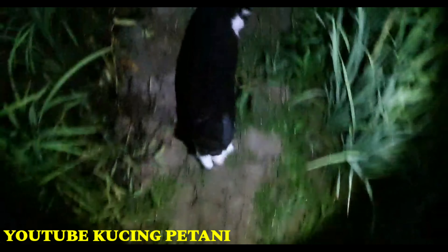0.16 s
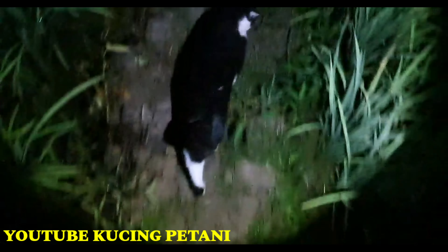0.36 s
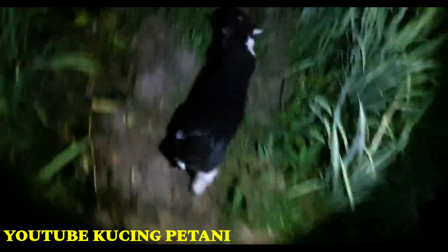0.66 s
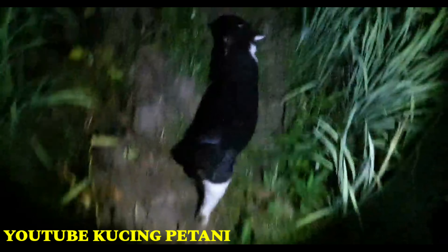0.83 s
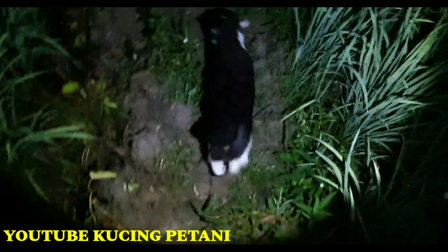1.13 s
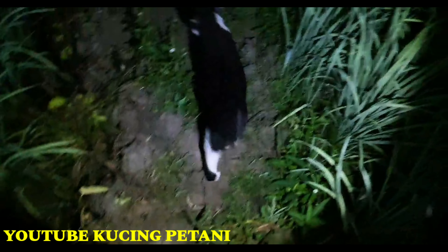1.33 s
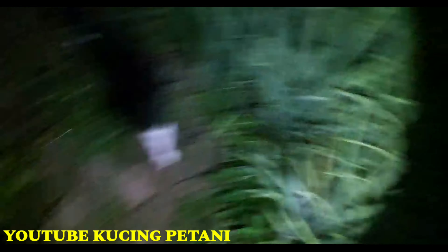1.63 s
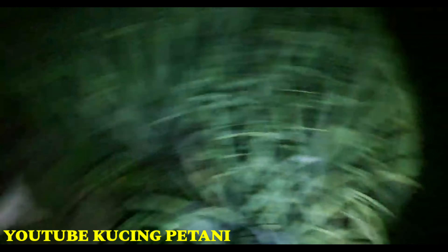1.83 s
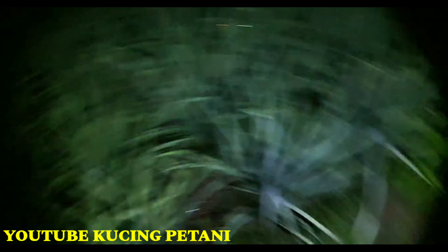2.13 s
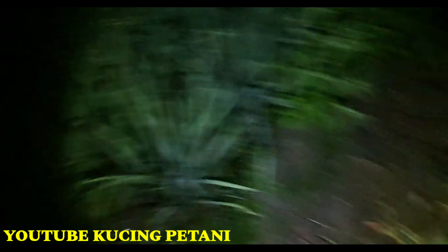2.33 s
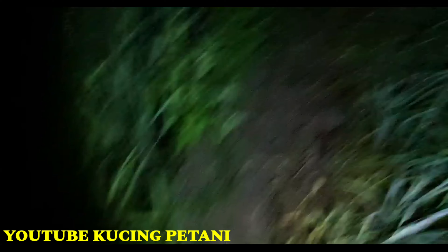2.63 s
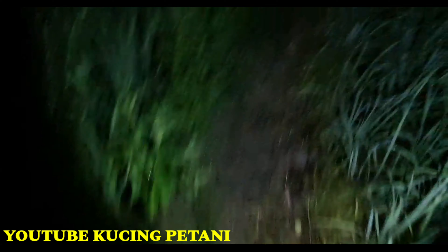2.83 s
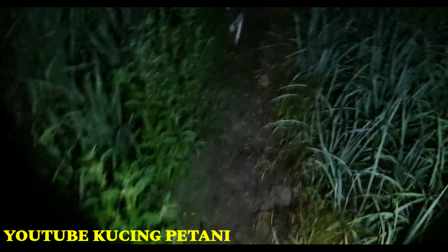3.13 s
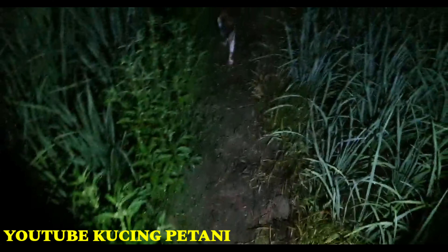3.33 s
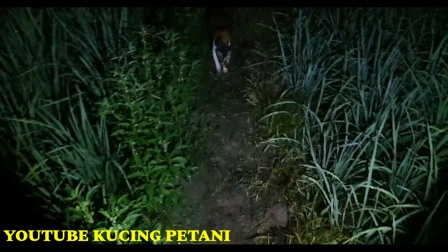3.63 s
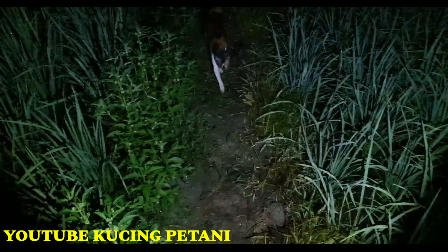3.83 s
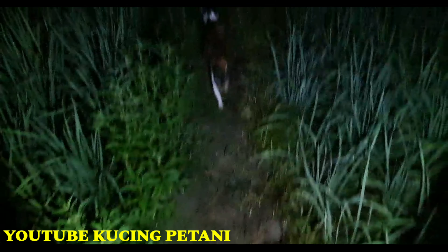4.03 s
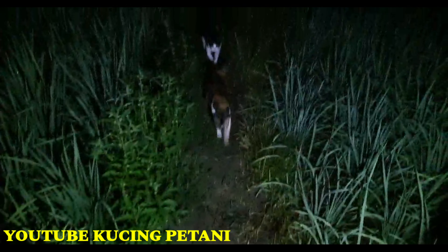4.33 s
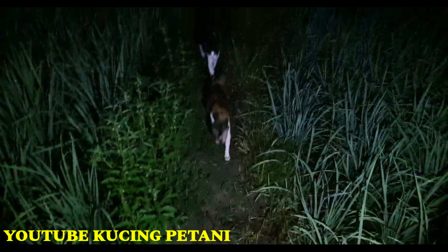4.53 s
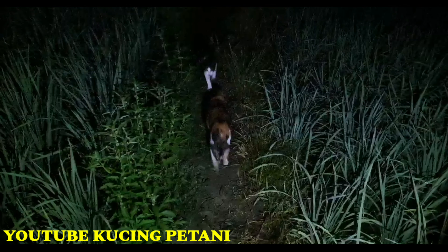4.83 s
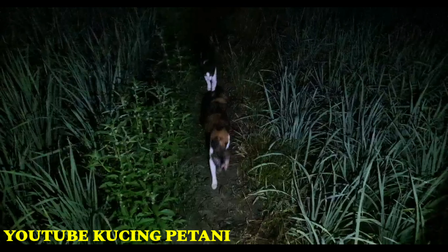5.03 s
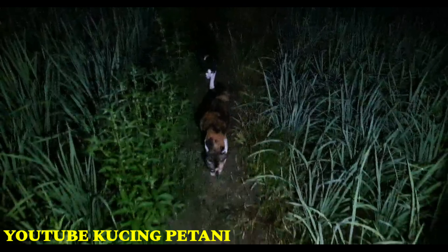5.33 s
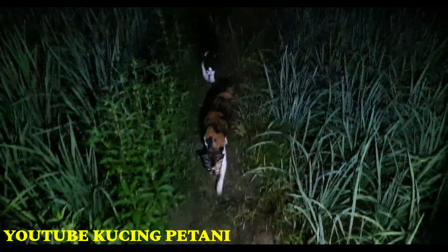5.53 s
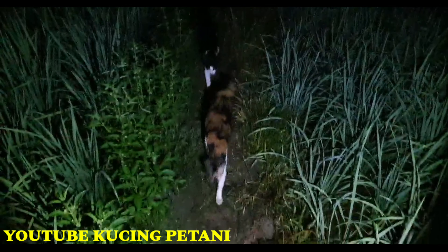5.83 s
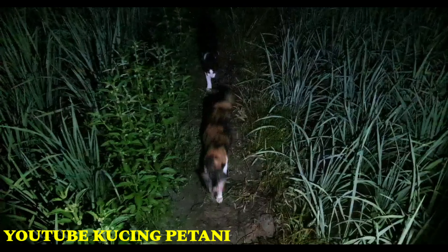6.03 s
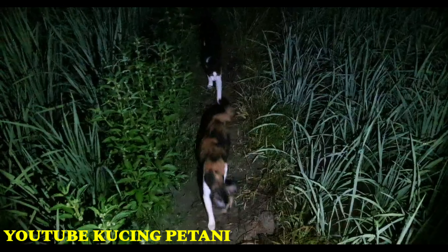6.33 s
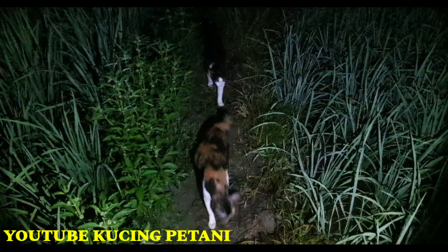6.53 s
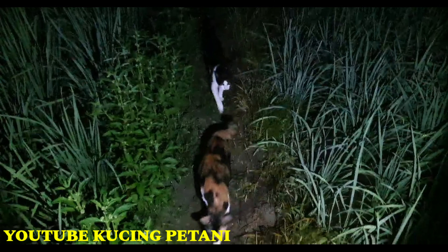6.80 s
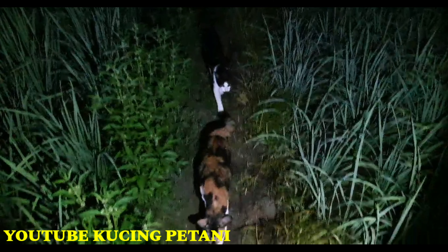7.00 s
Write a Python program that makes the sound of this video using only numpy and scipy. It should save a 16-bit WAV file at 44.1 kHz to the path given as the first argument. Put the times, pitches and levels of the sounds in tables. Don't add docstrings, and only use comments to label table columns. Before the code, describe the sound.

Frogs in a night rice field trill in turn with rapid knocking croaks, over a blurred distant frog chorus and steady high insect hiss.

```python
import sys
import numpy as np
from scipy import signal
from scipy.io import wavfile
from scipy.ndimage import uniform_filter1d, map_coordinates

SR = 44100
rng = np.random.default_rng(int(sys.argv[2]) if len(sys.argv) > 2 else 0)


def unload_wav(signal):
    wavfile.write(
        sys.argv[1],
        SR,
        np.round(np.clip(np.atleast_2d(signal).T, -1, 1) * 32767).astype(np.int16),
    )


def boost(x):
    u = np.asarray(x, float) / 20
    return 10 ** u


N = 315756

T = np.arange(800) / SR
LEAD = .0042

# time in seconds, strength in dB.
CHORUS_SWELL = [(0, -43.5), (.32, -42.5), (.8, -44), (1.1, -41.5), (1.4, -42.5), (2.0, -45.5), (2.43, -44),
                (2.7, -38.5), (3.0, -39.5), (3.5, -42.5), (3.9, -39), (4.2, -43), (4.95, -42), (5.3, -39),
                (6.04, -37.5), (6.5, -40.5), (6.9, -45.5), (7.16, -41)]
# time in seconds, gain in dB.
TURNING = [(0, -0.5), (.2, 0.5), (1.43, 1), (2.33, -4), (2.47, -2), (2.75, -4.5), (5, -6.5), (7.16, -7.5)]


def unit(x):
    return x / np.sqrt(np.mean(x ** 2) + 1e-20)


def along(points, hz):
    f, v = np.transpose(points)
    return np.interp(np.log(hz + 1), np.log(f + 1), v)


def curves(rows):
    s, *cols = np.transpose(rows)
    return [np.interp(np.arange(N) / SR, s, c) for c in cols]


def wobble(rate):
    coarse = np.arange(0, N + 32, 32)
    knots = rng.standard_normal(int(N * rate / SR) + 4)
    return np.interp(np.arange(N), coarse, map_coordinates(knots, [coarse * rate / SR]))


def rush(spectrum, patchy_db, size=512):
    hz, _, z = signal.stft(rng.standard_normal(N), SR, nperseg=size)
    patches = uniform_filter1d(rng.standard_normal(z.shape), size=5, axis=0)
    patches = uniform_filter1d(patches, size=8, axis=1)
    gain_db = along(spectrum, hz)[:, None] + patchy_db * unit(patches)
    return unit(signal.istft(z * boost(gain_db), nperseg=size)[1][:N])


def grunt(hz, swell):
    u = T / swell
    return -u ** 2 * np.exp(2 - 2 * u) * np.sin(2 * np.pi * hz * T)


def snap(sac, pitch, rise, scatter_db):
    t = np.clip(T - LEAD, 0, None)
    ring = 0
    for k, (hz, db, t60) in enumerate(sac):
        decay = boost(db + scatter_db * rng.normal() - 60 * t / t60)
        ring = ring + (-1) ** k * decay * np.sin(2 * np.pi * hz * pitch * t)
    return ring * (1 - np.exp(-t / rise)) ** 2


def rasp(t60):
    torn_air = signal.butter(3, [800, 5300], "bandpass", fs=SR, output="sos")
    burst = (T > LEAD + .0004) * boost(-60 * np.abs(T - LEAD) / t60)
    return signal.sosfilt(torn_air, burst * rng.standard_normal(len(T)))


def add(track, s, sound):
    start = int(np.clip(round((s - LEAD - .0011) * SR), 0, N))
    track[start:start + len(sound)] += sound


def slacken(sac, weak, bright):
    slack = []
    for hz, db, t60 in sac:
        bend = 1 - .0018 * weak * (2700 < hz < 4000) + .006 * weak * (hz > 4500)
        gain_db = bright * (hz > 2700) - .7 * max(weak, -7) * (hz > 4000 or hz < 1050)
        slack.append((hz * bend, db + gain_db, t60))
    return slack


def frog(notes, sac, full_db, gap_ms, grunt_db, grunt_hz, rise, rasp_db):
    # time in seconds, loss in dB.
    falters = [
        (1.2098, -8),
        (2.614, -19),
        (2.634, -4),
        (2.6995, -12),
        (5.7691, -30),
    ]
    out = np.zeros(N + len(T))
    for s, db, fourth in notes:
        weak = db - full_db
        shift = 4 * boost(fourth)
        gap = (gap_ms + min(-.06 * weak, .65)) / 1000
        for k, step in enumerate([-.5 - shift, 0, -2.6 + shift, fourth]):
            at = s + (k - 1) * gap
            step = step + (k != 1) * .6 * rng.normal()
            step = step + sum(lost for t, lost in falters if abs(t - at) < .002)
            part = min(k, 2)
            pitch = 1 + .006 * weak + .004 * max(step, -8) + .013 * (part - 1) + .01 * rng.normal()
            slack = slacken(sac, weak, bright=1.3 * (part - 1.5) - .3 * weak)
            low = boost(grunt_db + 0.25 * weak + 0.31 * step + rng.normal()) * grunt(grunt_hz, swell=0.0025)
            low = low + boost(rasp_db - 0.19 * max(weak, -8) + 0.55 * step) * rasp(t60=0.018)
            drag = (k == 3) * rng.uniform(.001, .003) * (fourth < -10)
            late = drag + .00012 * rng.normal()
            add(out, at + late, boost(db + step) * snap(slack, pitch, rise, scatter_db=.9) + low)
    return out[:N]


def near_frog():
    # second pulse in seconds, effort in dB, fourth pulse in dB against the second.
    first_trill = [(2.624, -25.5, -16), (2.6896, -17.5, -20), (2.758, -19.5, -18), (2.8303, -16, -13),
                   (2.9062, -15, -19), (2.9815, -12.5, -18), (3.0572, -11, -19), (3.1346, -10.3, -16),
                   (3.2088, -9, -22), (3.2853, -9.5, -20), (3.3667, -8.7, -18), (3.4441, -8.1, -17),
                   (3.5216, -8.1, -18), (3.5983, -8.8, -19), (3.6765, -8.8, -20), (3.7536, -8.6, -17),
                   (3.8324, -8.6, -20), (3.9102, -7.9, -17), (3.9907, -8.7, -15), (4.0717, -8.5, -16)]
    second_trill = [(5.7292, -20.5, -15), (5.7791, -13.7, -18), (5.8701, -14.8, -14), (5.9424, -11, -11),
                    (6.0161, -10.4, -14), (6.0926, -9.6, -18), (6.1674, -10, -26), (6.2397, -9.5, -18),
                    (6.3198, -9.6, -8), (6.3965, -10.3, -15), (6.4725, -9.8, -18), (6.5482, -9.3, -20),
                    (6.6295, -9.7, -20), (6.7105, -8.7, -12), (6.8014, -9.8, -3.5), (6.8879, -10.7, -19),
                    (6.9657, -9.7, -21), (7.0528, -8.9, -6.5), (7.1321, -9.5, -23)]
    # frequency in Hz, level in dB, t60 in seconds.
    sac = [(995, -8, .005), (2033, -5.5, .0074), (2419, 1, .0122), (2917, -2.1, .0086), (3250, -9, .0085),
           (5247, -32.5, .0097), (4700, -36, .008)]
    return frog(first_trill + second_trill, sac, full_db=-8.5, gap_ms=9.33, grunt_db=-23, grunt_hz=595.6,
                rise=0.0003, rasp_db=-31)


def left_frog():
    # second pulse in seconds, effort in dB, fourth pulse in dB against the second.
    notes = [(.0426, -21.5, -23), (.1258, -21, -30), (.204, -18, -26), (.2852, -19.5, -21),
             (.3716, -18, -9), (.4542, -17.5, -28), (.5392, -17.5, -15), (.622, -16.5, -26),
             (.703, -16.5, -29), (.7824, -16.5, -29), (.8681, -16, -10), (.9504, -16, -27),
             (1.037, -15.5, -13), (1.1225, -14.7, -23), (1.2195, -15.7, -13)]
    # frequency in Hz, level in dB, t60 in seconds.
    sac = [(945, 9.5, .0029), (1824, 14.7, .0027), (2201, 12.3, .0089), (2800, 9, .005),
           (5280, -12.5, .013), (4050, -13, .0086)]
    return frog(notes, sac, full_db=-14.5, gap_ms=9.65, grunt_db=-27, grunt_hz=556, rise=.00097, rasp_db=-32.5)


def low_frog():
    # second pulse in seconds, effort in dB, fourth pulse in dB against the second.
    notes = [(5.1697, -28, -12), (5.2441, -22.5, -17), (5.3283, -23.5, -6), (5.4207, -20.5, -6),
             (5.5069, -22, 0), (5.5919, -21, -3.5), (5.6721, -21, -1), (5.7667, -20.5, -3),
             (5.8603, -18, -3.5), (5.9528, -20, -25), (6.036, -21.5, -21), (6.1184, -20, 0),
             (6.2168, -20.5, -2), (6.3157, -20.5, -2)]
    # frequency in Hz, level in dB, t60 in seconds.
    sac = [(2073, 9.4, .0117), (1100, -4, .004), (2341, 13, .0039), (3200, -14, .007)]
    return frog(notes, sac, full_db=-21.0, gap_ms=9.2, grunt_db=-28.5, grunt_hz=623, rise=0.00054, rasp_db=-39)


def far_notes(notes, grunt_db):
    # frequency in Hz, level in dB, t60 in seconds.
    sac = [(1086, -4.5, 0.0042), (1930, 3, 0.0026), (2227, 6.5, 0.0072), (2710, 1, 0.0018)]
    low, high = np.zeros((2, N + len(T)))
    for s, db, pitch in notes:
        for k, (a, b, c, d) in enumerate(rng.standard_normal((4, 4))):
            at = s + k * .0094 + .0006 * a
            add(low, at, boost(db + grunt_db + 2.5 * b) * grunt(595 * pitch ** .7, swell=0.0023))
            add(high, at, boost(db + 1.8 * c) * snap(sac, pitch + .03 * d, rise=.0007, scatter_db=1.5))
    return low[:N], high[:N]


def far_frogs():
    # time in seconds, effort in dB, sac pitch as a factor.
    notes = [(1.287, -35, 0.99), (1.373, -44, 1.0), (1.46, -37, 1.0), (1.525, -34, 0.95),
             (1.601, -35.5, 0.83), (1.67, -32, 0.96), (1.742, -31.5, 0.97), (1.802, -29, 0.96),
             (1.879, -31.5, 0.91), (1.975, -34, 1), (2.091, -29.5, 1.0), (2.416, -32.5, 0.91),
             (2.485, -29.5, 1), (2.543, -30.5, 0.94), (4.198, -33, 0.89), (4.283, -41, 0.94),
             (4.37, -35, 0.97), (4.45, -28, 0.94), (4.509, -28, 1.0), (4.577, -29, 1.0), (4.647, -29, 1.0),
             (4.718, -32.5, 0.94), (4.786, -27, 0.9), (4.855, -28, 0.95), (4.924, -27.5, 1.0),
             (5.0, -30.5, 1.0), (5.077, -29, 0.99)]
    return boost(5.1) * sum(far_notes(notes, grunt_db=-13))


def field(x, slow, size=SR // 3):
    # frequency in Hz, t60 in seconds.
    scatter = [(300, 0.046), (2500, 0.29), (6000, 0.029)]
    out = np.zeros(N + 2 * size)
    for start in range(0, N, size):
        hz, t, z = signal.stft(rng.standard_normal(size), SR, nperseg=128)
        decay = boost(-60 * t / (slow * along(scatter, hz)[:, None]))
        tail = signal.istft(z * decay, SR, nperseg=128)[1][:size]
        answer = signal.fftconvolve(x[start:start + size], tail / np.linalg.norm(tail))
        out[start:start + len(answer)] += answer
    return out[:N]


def chorus(count):
    strength_db, = curves(CHORUS_SWELL)
    notes = []
    for pace, pitch, distance in rng.random((count, 3)):
        gaps = (.07 + .022 * pace) * (1 + .04 * rng.standard_normal(110))
        times = np.cumsum(gaps) - .09 * distance
        swell = 1.5 * wobble(0.578)
        notes += [(s, swell[int(s * SR)] - 6 * distance, 0.797 + .26 * pitch) for s in times if 0 < s < N / SR]
    low, high = far_notes(notes, grunt_db=0)
    low = unit(low + boost(-3.5) * field(low, slow=1.13))
    high = unit(high + boost(-5.5) * field(high, slow=1.13))
    return boost(strength_db) * (boost(0.27) * low + boost(-0.77) * high)


def small_frogs(count):
    dry, t = np.zeros(N), np.arange(N) / SR
    for pitch, pace, start in rng.random((count, 3)):
        notes = np.sin(2 * np.pi * ((11.5 + 3 * pace) * t + start)) > .2
        strength = boost(2.5 * rng.standard_normal(N) + 3 * wobble(1.5))
        ticks = notes * (rng.random(N) < 300 / SR) * strength
        sac = boost(-60 * T / .013) * np.sin(2 * np.pi * (3070 + 250 * pitch) * T) * (1 - np.exp(-T / .0007))
        dry += signal.fftconvolve(ticks, sac)[:N]
    return boost(-51 + 0.64 * curves(TURNING)[0]) * unit(dry + field(dry, slow=0.94))


def flutter():
    return boost(0.2 * wobble(40) + 1.3 * wobble(120))


def wing(hz):
    return np.sin(2 * np.pi * np.cumsum(hz + 20 * wobble(3) + 25 * wobble(40)) / SR)


def insects():
    # frequency in Hz, level in dB per Hz.
    main_hiss = [(5000, -41), (5800, -30), (6300, -7.5), (6650, -2.5), (7400, 0.5), (8000, -2), (8800, -6),
                 (9800, -16), (11000, -60)]
    top_hiss = [(8500, -59), (9600, 1), (11000, 0), (11900, -1), (12400, -19), (13000, -60)]
    # frequency in Hz, level in dB against the hiss.
    soloists = [(6600, -13), (6900, -12), (7350, -10), (7600, -14), (7880, -10), (8300, -15), (8700, -16)]
    turn_db, = curves(TURNING)
    hiss_db, top_db = turn_db - 42.5, 0.5 * turn_db - 12.0
    singers = sum(boost(db + 1.8 * wobble(2.5) + 2.4 * wobble(35)) * wing(hz) for hz, db in soloists)
    hiss = boost(hiss_db) * unit(flutter() * rush(main_hiss, patchy_db=0.5) + singers)
    return hiss + boost(hiss_db + top_db) * unit(flutter() * rush(top_hiss, patchy_db=1.5))


def night_air():
    # frequency in Hz, level in dB per Hz.
    spectrum = [(150, -64), (350, -4.5), (900, -1), (1400, -2.5), (3150, -3.5), (3600, -9), (5400, -11),
                (6200, -9.5), (7000, -76)]
    air_db = -46.0 + 0.99 * (curves(CHORUS_SWELL)[0] + 41)
    return boost(air_db) * rush(spectrum, patchy_db=2.0)


def ground():
    # frequency in Hz, level in dB per Hz.
    spectrum = [(15, -29), (45, -3), (100, -7.5), (200, -7), (320, -9), (500, -50)]
    return boost(-72.5 + 4.3 * wobble(2.81)) * rush(spectrum, patchy_db=-1.0, size=4096)


def grip():
    # time in seconds, level in dB.
    presses = [
        (2.268, -50),
        (2.398, -68),
        (2.545, -48),
        (2.644, -54),
    ]
    t = np.arange(N) / SR
    force = sum(boost(db + np.minimum(500 * (t - s), 220 * (s - t))) for s, db in presses)
    return force * rush([(15, -20), (45, 0), (70, -5), (100, -22), (200, -90)], patchy_db=0, size=4096)


def steps():
    # time in seconds, level in dB.
    footfalls = [
        (.12, -74),
        (.55, -66),
        (1.18, -69),
        (1.65, -64),
        (2.67, -67),
        (3.5, -68.5),
        (5.9, -66),
    ]
    # frequency in Hz, level in dB per Hz.
    soil = [(60, -30), (110, -6.5), (220, -5), (330, -10), (500, -50)]
    t, half_s = np.arange(N) / SR, 0.16
    weight = sum(boost(db) * np.exp(-((t - s) / half_s) ** 2) for s, db in footfalls)
    return weight * rush(soil, patchy_db=3, size=2048)


def scene():
    left, near, low, far = left_frog(), near_frog(), low_frog(), far_frogs()
    wet = boost(-19) * sum(field(voice, slow=.45) for voice in (left, near, low))
    wet = wet + boost(-4.5) * field(far, slow=0.2)
    others = near + low + far + wet + chorus(count=11) + small_frogs(count=6)
    tight = signal.butter(2, 430, "highpass", fs=SR, output="sos")
    above = signal.butter(3, 360, "highpass", fs=SR, output="sos")
    frogs = signal.sosfiltfilt(above, left + signal.sosfiltfilt(tight, others))
    return (frogs + insects() + night_air() + ground() + grip() + steps())[None]


def starve(x):
    hz, _, z = signal.stft(x, SR, nperseg=1024)
    level = uniform_filter1d(uniform_filter1d(np.abs(z) ** 2, size=8, axis=1), size=3, axis=2)
    luck = rng.random((129, z.shape[2] // 3 + 1))
    luck = np.kron(luck, np.ones((4, 3)))[:513, :z.shape[2]]
    busy = uniform_filter1d(level.sum(axis=1)[0], size=3)
    odds = np.where((hz > 6500) & (hz < 10800), .03, .19)[:, None] + .2 * np.roll(busy, 2) / busy.max()
    starved = (level < boost(-69) ** 2) & (luck < odds) & (hz[:, None] > 3400)
    edge_hz = 11950 + 350 * luck[0] ** 2
    return signal.istft(z * ~starved * (hz[:, None] < edge_hz), SR, nperseg=1024)[1][:, :N]


def blink(x):
    hz, _, z = signal.stft(x, SR, nperseg=256)
    power = uniform_filter1d(np.sum(np.abs(z) ** 2, axis=1)[0], size=4)
    jump = np.roll(power, -2) > boost(2 * 10.5) * np.roll(power, 4)
    low, wide = np.repeat(rng.random((2, len(power) // 3 + 1)), 3, axis=1)[:, :len(power)]
    low_hz = 9000 + 2500 * low
    lost = jump & (hz[:, None] > low_hz) & (hz[:, None] < low_hz + 3000 * wide)
    return signal.istft(z * ~lost, SR, nperseg=256)[1][:, :N]


def band_limit(x):
    return signal.sosfilt(signal.butter(12, 12670, fs=SR, output="sos"), x)


def record(dry):
    mix = blink(starve(dry))
    return band_limit(mix)


dry = scene()
out = record(dry)
unload_wav(out)
```